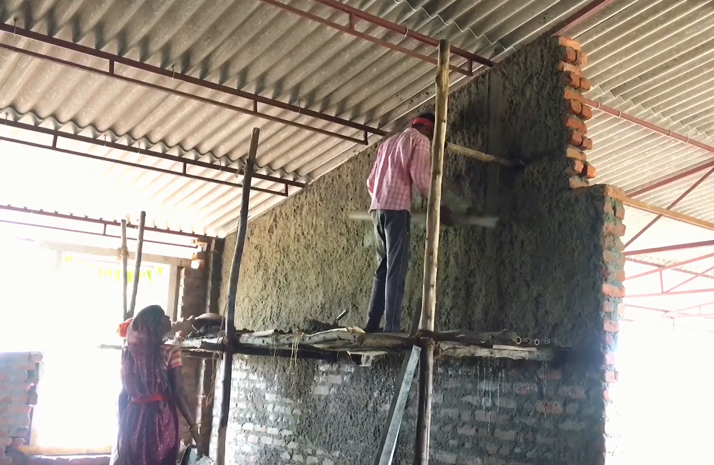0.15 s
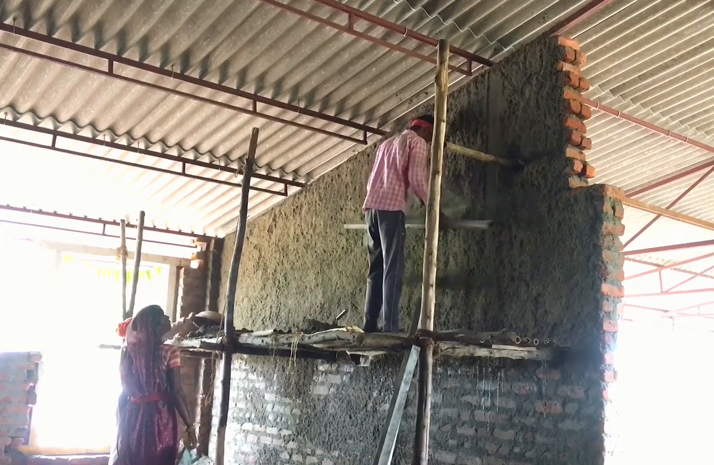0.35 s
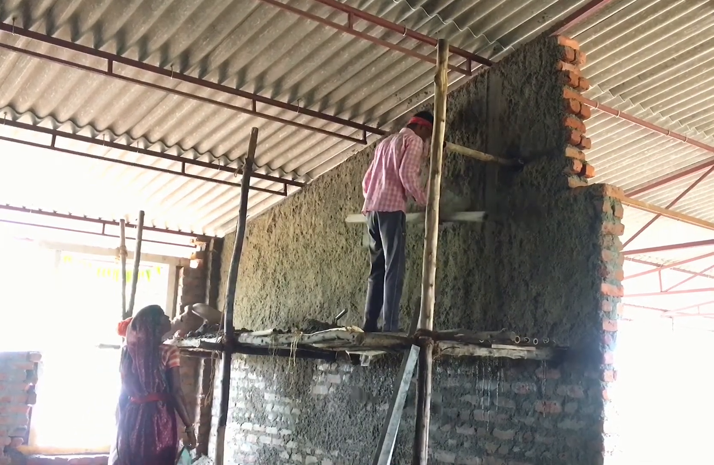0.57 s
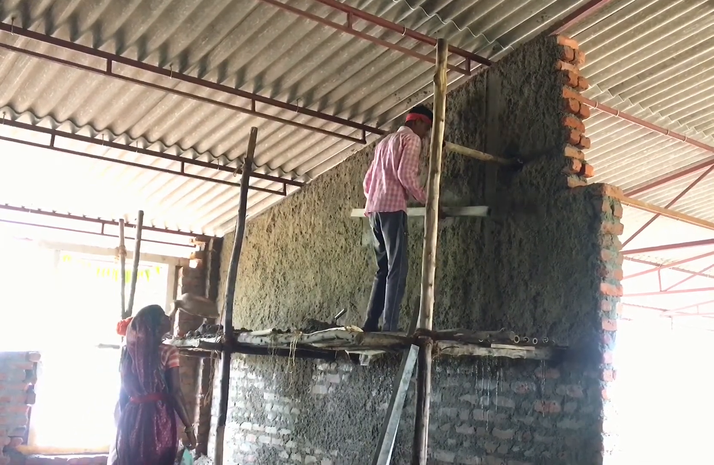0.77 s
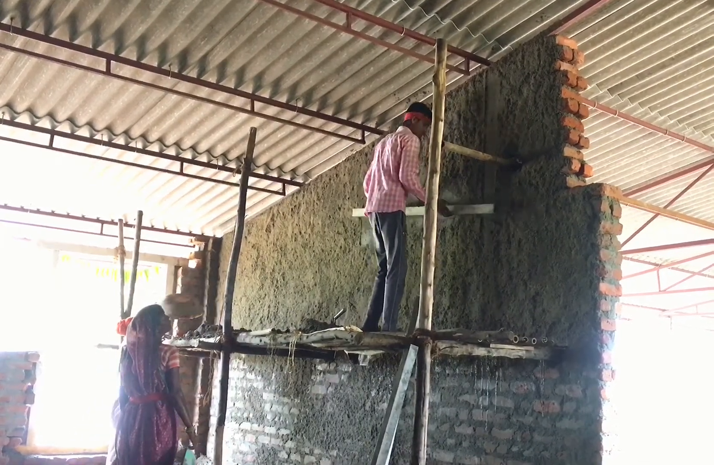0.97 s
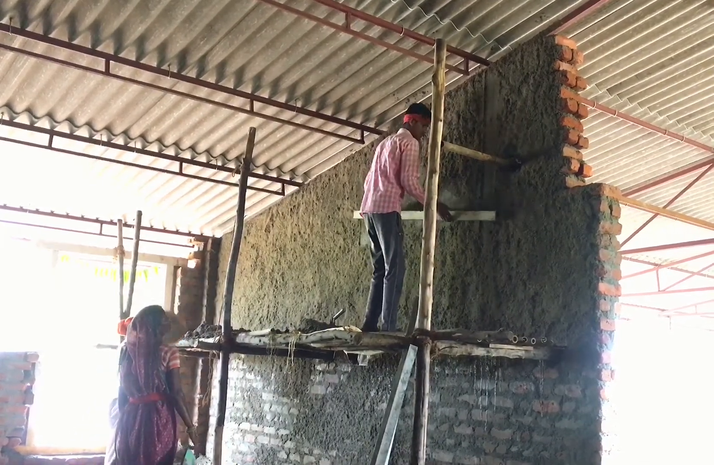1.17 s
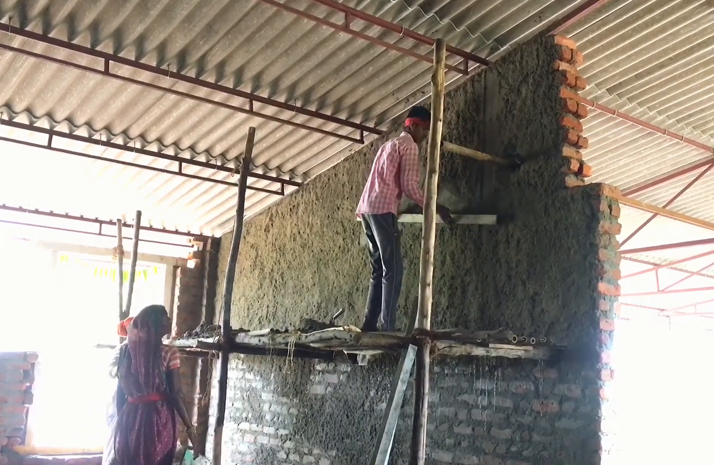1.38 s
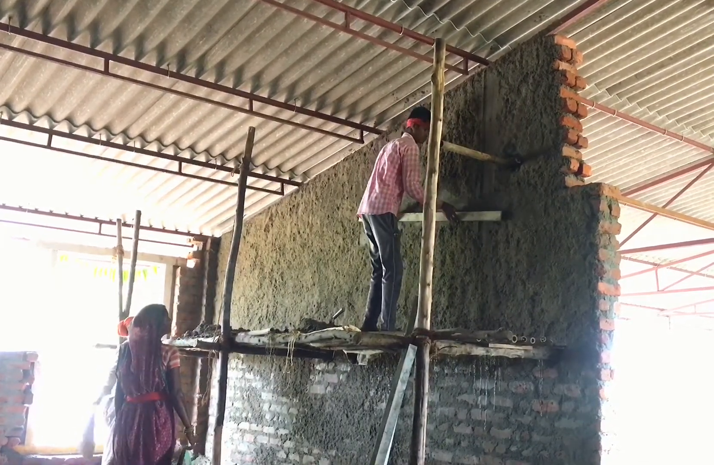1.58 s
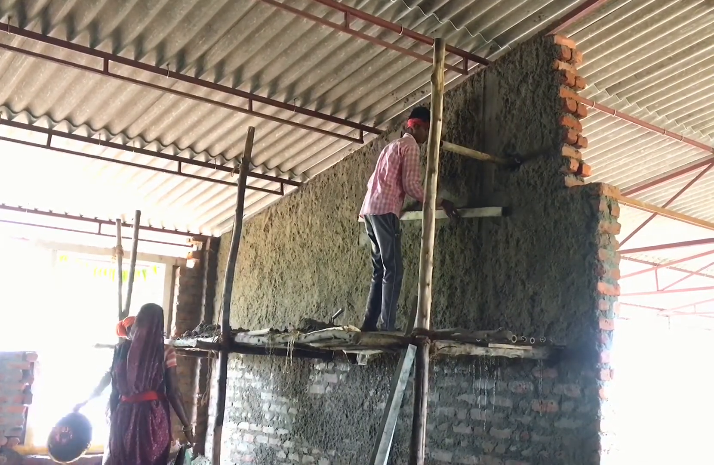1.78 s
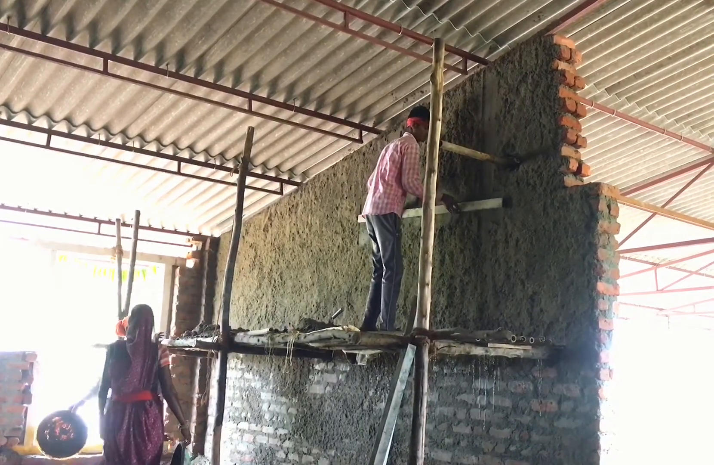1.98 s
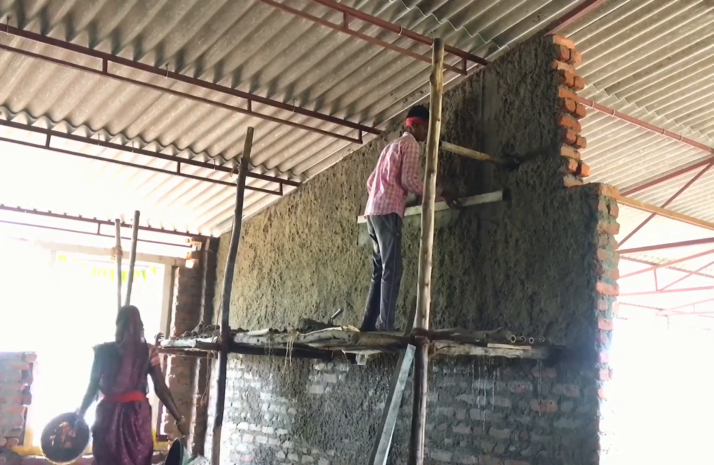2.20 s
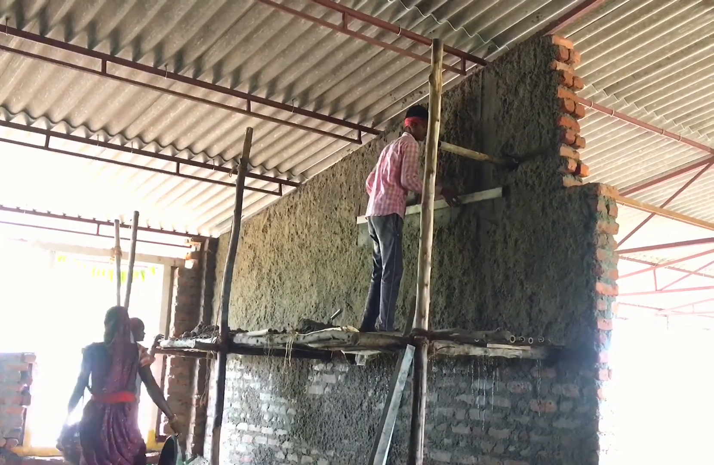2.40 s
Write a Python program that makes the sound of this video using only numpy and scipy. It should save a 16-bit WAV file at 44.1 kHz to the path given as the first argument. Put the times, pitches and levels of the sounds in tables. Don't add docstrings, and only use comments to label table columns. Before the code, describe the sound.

Plastering on a scaffold in an open shed: two dull plank thumps with a low rocking boom, loose mortar pattering down, faint thuds, then a gritty straightedge scrape over wet wall, heard by one microphone.

```python
import sys
import numpy as np
from scipy import signal
from scipy.fft import rfft, irfft
from scipy.io import wavfile

SR = 44100
rng = np.random.default_rng(int(sys.argv[2]) if len(sys.argv) > 2 else 0)


def store_wav(level_fs):
    pcm = np.round(np.clip(np.atleast_2d(level_fs), -1, 1) * 32767)
    wavfile.write(sys.argv[1], SR, pcm.T.astype(np.int16))


def amplitude_ratio(level_db):
    exponent = np.asarray(level_db, float) / 20
    return 10 ** exponent


N = 108045


def clock():
    return np.arange(N) / SR


def evened(x):
    return x / np.sqrt(np.mean(x ** 2) + 1e-20)


def read(points, hz):
    point_hz, value = np.transpose(points)
    return np.interp(np.log(hz + 1), np.log(point_hz + 1), value)


def coloured(x, points):
    gain = amplitude_ratio(read(points, np.fft.rfftfreq(N, 1 / SR)))
    return evened(irfft(rfft(x) * gain, N))


def resonate(x, hz, width_hz):
    radius = np.exp(-np.pi * width_hz / SR)
    pole = radius * np.exp(2j * np.pi * hz / SR)
    return 2 * signal.lfilter([1 - radius], [1, -pole], x).real


def grains(per_s, spread_db):
    size_db = spread_db * np.minimum(rng.exponential(1, N), 5)
    size = amplitude_ratio(size_db) * rng.standard_normal(N)
    return evened(size * (rng.random(N) < per_s / SR))


def drift():
    return evened(np.interp(clock(), np.arange(50) * .05, rng.standard_normal(50)))


def ring(start_s, ring_db, modes, contact_s):
    t = np.maximum(clock() - start_s, 0)
    tones = sum(amplitude_ratio(db - 60 * t / t60) * np.sin(2 * np.pi * hz * t) for hz, db, t60 in modes)
    return amplitude_ratio(ring_db) * tones * (1 - np.exp(-t / contact_s))


def floor():
    # (frequency [Hz], level [dB])
    air_colour = [(200, -14), (330, -4), (700, -3), (2000, -7), (4000, -11), (9000, -13), (15500, -27)]
    # (frequency [Hz], width [Hz], level [dB])
    rumble = [(40, 20, -71), (62, 18, -57), (105, 40, -62), (170, 30, -65), (260, 80, -72)]
    air = amplitude_ratio(-62.5) * coloured(rng.standard_normal(N), air_colour)
    hum = 0
    for hz, width_hz, db in rumble:
        once = resonate(rng.standard_normal(N), hz, width_hz)
        hum = hum + amplitude_ratio(db) * evened(resonate(once, hz, width_hz))
    fade_db_per_s = -2.5
    return air + hum * amplitude_ratio(fade_db_per_s * (clock() - 1))


def knocks():
    # (time [s], level [dB])
    knock_hits = [
        (.001, -39),
        (2.36, -49),
    ]
    # (frequency [Hz], level [dB], t60 [s])
    knock_modes = [(92, -9, .3), (165, -2, .3), (178, -5, .3), (235, -10, .3), (290, -13, .3)]
    # (time [s], level [dB])
    thud_hits = [
        (.545, -50),
        (.605, -43),
        (.83, -47),
        (.94, -42),
        (1.36, -46),
        (1.48, -46),
    ]
    # (frequency [Hz], level [dB], t60 [s])
    thud_modes = [(60, 0, .35), (76, -5, .2)]
    boxy = sum(ring(s, db, knock_modes, .012) for s, db in knock_hits)
    deep = sum(ring(s, db, thud_modes, .02) for s, db in thud_hits)
    return boxy + deep


def shower(events, colour):
    t = clock()
    power = 0
    for peak_s, db, rise_s, fall_s in events:
        slope = np.where(t < peak_s, (peak_s - t) / rise_s, (t - peak_s) / fall_s)
        power = power + amplitude_ratio(2 * (db - 20 * slope))
    return np.sqrt(power) * coloured(grains(20000, 1.5), colour)


def mortar():
    # (peak time [s], level [dB], rise [s per 20 dB], fall [s per 20 dB])
    patter = [(.003, -53, .01, .08), (.055, -54, .015, .14), (.14, -42, .012, .07), (.22, -53, .05, .1),
              (.33, -60, .1, .2), (.42, -50, .07, .06), (.49, -56, .02, .12), (.65, -47, .12, .2),
              (.695, -41, .03, .1), (.725, -36, .05, .1), (.8, -50, .03, .2), (1.0, -57, .15, .3),
              (1.05, -56, .03, .04), (1.29, -61, .015, .1), (1.615, -59, .01, .04)]
    # (frequency [Hz], level [dB])
    patter_colour = [(180, -30), (350, -8), (900, -5), (1620, -4), (2560, -5), (6680, -4), (10500, -6),
                     (15500, -16)]
    # (peak time [s], level [dB], rise [s per 20 dB], fall [s per 20 dB])
    slump = [
        (.01, -55, .02, .35),
        (.3, -56, .15, .25),
        (.83, -48, .06, .15),
        (.92, -55, .15, .35),
        (1.04, -57, .1, .08),
    ]
    # (frequency [Hz], level [dB])
    slump_colour = [(200, -14), (350, -2), (700, 0), (1500, -3), (2500, -8), (5000, -24), (15500, -45)]
    return shower(patter, patter_colour) + shower(slump, slump_colour)


def thump(start_s, ring_db, crack_db, contact_s, modes):
    # (frequency [Hz], level [dB])
    crack_colour = [(80, -14), (250, -4), (450, -7), (700, -7), (1200, -8), (2000, -17), (4500, -22),
                    (15500, -36)]
    # (frequency [Hz], t60 [s])
    crack_t60 = [(150, .5), (500, .24), (1500, .26), (5000, .2), (12000, .15)]
    hz, t, bands = signal.stft(coloured(rng.standard_normal(N), crack_colour), SR, nperseg=256)
    bands = bands * amplitude_ratio(-60 * np.maximum(t - start_s, 0) / read(crack_t60, hz)[:, None])
    crack = signal.istft(bands, SR, nperseg=256)[1][:N]
    onset = np.clip((clock() - start_s) / contact_s + .3, 0, 1) ** 2
    return ring(start_s, ring_db, modes, contact_s) + amplitude_ratio(crack_db) * crack * onset


def thumps():
    # (frequency [Hz], level [dB], t60 [s])
    first_planks = [(255, -6, .15), (320, -4, .15), (430, -14, .15), (605, -6, .16), (720, -14, .12),
                    (1000, -8, .14), (1260, -15, .15), (1465, -12, .12)]
    second_planks = [(300, -11, .25), (362, -1, .2), (425, -9, .2), (610, -7, .18), (730, -10, .15),
                     (1044, -5, .2), (1144, -8, .15), (1450, -12, .15), (1855, -12, .15)]
    # time [s], ring level [dB], crack level [dB], contact [s]
    first_blow = (.131, -21.5, -29, .008)
    touch = (.685, -43, -42, .008)
    second_blow = (.704, -26, -28, .002)
    first = thump(*first_blow, first_planks)
    second = thump(*touch, second_planks) + thump(*second_blow, second_planks)
    return shed(first, wet_db=-9) + shed(second, wet_db=-9)


def frame():
    # (time [s], level [dB])
    frame_hits = [
        (.139, -19),
        (.722, -25),
    ]
    # (frequency [Hz], level [dB], t60 [s])
    first_modes = [(98, 2, .15), (122, -7, .2), (172, -10, .45), (183, -13, .4), (250, 1, .22),
                   (275, -13, .4), (325, -3, .3), (345, -13, .35)]
    second_modes = [(55, -11, .25), (108, -2, .25), (128, -10, .3), (145, -15, .7), (162, -10, .4),
                    (173, -1, .5), (186, -13, .5), (235, -13, .6), (290, -15, .5)]
    # (frequency [Hz], level [dB], t60 [s])
    bounce = (.216, -20, [(190, -11, .25), (236, -11, .7), (249, 1, .3), (262, -9, .5), (290, -12, .35),
              (335, -12, .25)])
    rock_s, rock_hz, rock_t60, rocks_per_s = .141, 67, .58, 9.1
    boom = ring(rock_s, -22.5, [(rock_hz, 0, rock_t60)], .01)
    boom = boom * np.sin(2 * np.pi * rocks_per_s * (clock() - rock_s))
    answers = sum(ring(s, db, modes, .006)
                  for (s, db), modes in zip(frame_hits, (first_modes, second_modes)))
    return boom + ring(*bounce, .012) + answers


def scrape():
    # (time [s], pressure [dB], dryness of the sand as treble [dB])
    drag = [(1.452, -72, 3), (1.461, -54, 3), (1.52, -57.5, 3), (1.565, -50, -2), (1.6, -56, -3),
            (1.65, -63, -3), (1.69, -50.5, -2), (1.74, -48, -4), (1.81, -45.5, -2), (1.91, -45, 1),
            (2.0, -47.5, 0), (2.07, -47.5, 0), (2.16, -46.5, .5), (2.28, -51, 1.5), (2.45, -54, 0)]
    # (frequency [Hz], level [dB])
    grit_colour = [(120, -24), (250, -19), (420, -14), (650, -9), (1200, -11), (2550, -10), (4000, -16),
                   (9000, -19.5), (15500, -36)]
    # (frequency [Hz], width [Hz], level [dB])
    edge_modes = [(371, 20, -14), (605, 26, -8.5), (680, 50, -16), (1108, 12, -15), (1680, 300, -13),
                  (2000, 300, -17), (2520, 250, -18)]
    treble_edge_hz, waver_db = 3000, 1.5
    s, pressure_db, treble_db = np.transpose(drag)
    sand = grains(12000, 2.2)
    grit = coloured(sand, grit_colour)
    hz = np.fft.rfftfreq(N, 1 / SR)
    dull = irfft(rfft(grit) / (1 + (hz / treble_edge_hz) ** 4), N)
    treble = (grit - dull) * amplitude_ratio(np.interp(clock(), s, treble_db))
    body = 0
    for mode_hz, width_hz, db in edge_modes:
        level_db = db + waver_db * drift()
        body = body + amplitude_ratio(level_db) * evened(resonate(sand, mode_hz, width_hz))
    pressure = amplitude_ratio(np.interp(clock(), s, pressure_db, left=-90) - 1)
    return pressure * (dull + treble + body)


def shed(x, wet_db):
    t = clock()[:SR]
    t60, first_reflection_s = .6, .012
    tail = rng.standard_normal(SR) * amplitude_ratio(-60 * t / t60) * (t > first_reflection_s)
    tail = tail / np.linalg.norm(tail)
    return x + amplitude_ratio(wet_db) * signal.fftconvolve(x, tail)[:N]


def scene():
    scaffold = shed(frame() + knocks(), wet_db=-13)
    plaster = shed(mortar() + scrape(), wet_db=-11)
    return (thumps() + scaffold + plaster + floor())[None]


def band_limit(x):
    return signal.sosfilt(signal.butter(12, 15730, fs=SR, output="sos"), x)


def record(dry):
    # (frequency [Hz], width [Hz], level [dB])
    notches = [(4900, 300, -4), (7600, 300, -3), (10400, 400, -5)]
    low_cut_hz = 34
    hz = np.fft.rfftfreq(N, 1 / SR)
    dips_db = sum(db * np.exp(-((hz - f) / width_hz) ** 2) for f, width_hz, db in notches)
    low_cut = hz ** 2 / np.sqrt(hz ** 4 + low_cut_hz ** 4)
    mix = irfft(rfft(dry) * amplitude_ratio(dips_db) * low_cut, N)
    return band_limit(mix)


dry = scene()
out = record(dry)
store_wav(out)
```